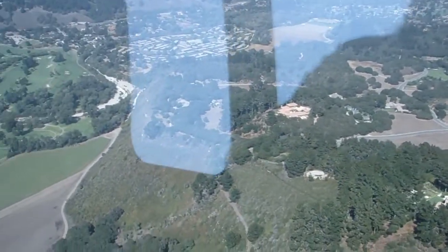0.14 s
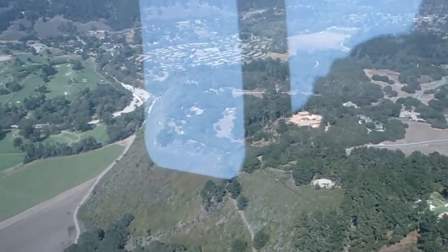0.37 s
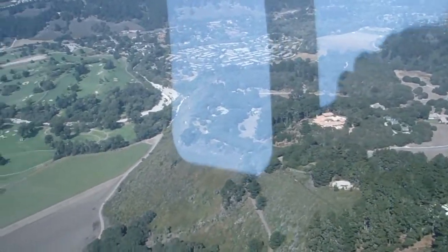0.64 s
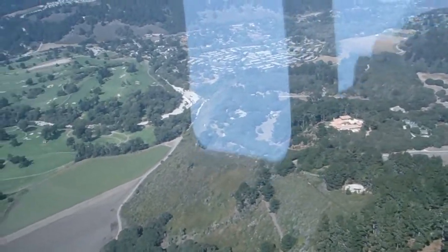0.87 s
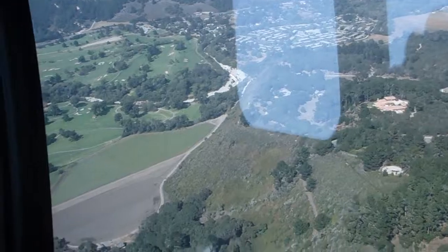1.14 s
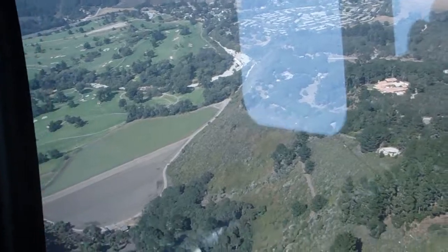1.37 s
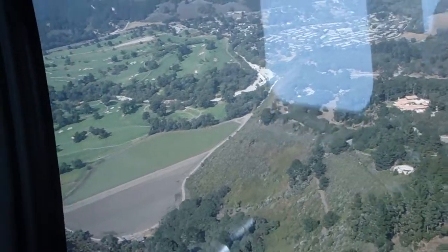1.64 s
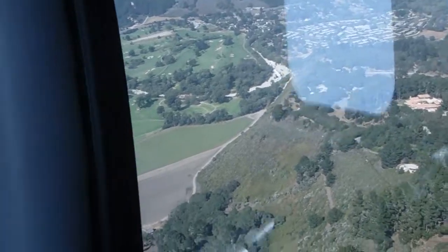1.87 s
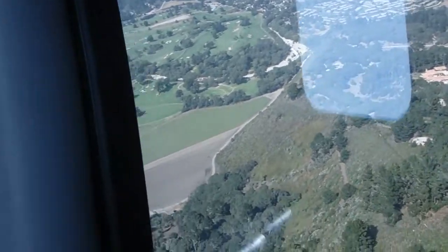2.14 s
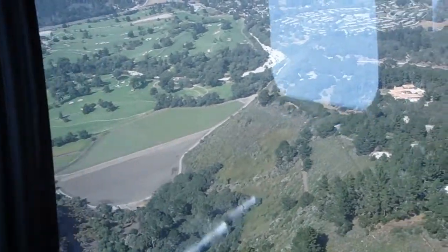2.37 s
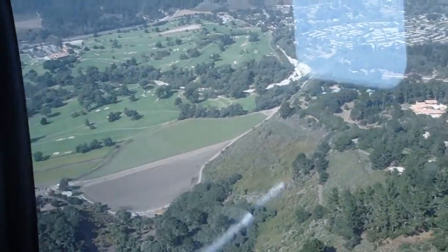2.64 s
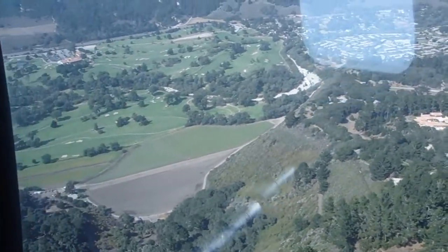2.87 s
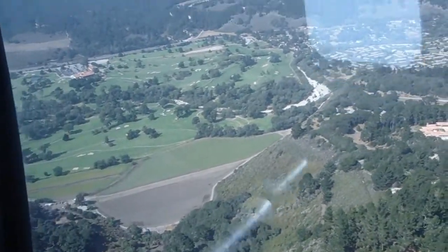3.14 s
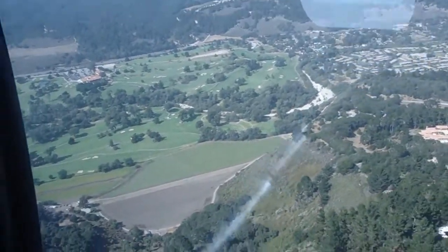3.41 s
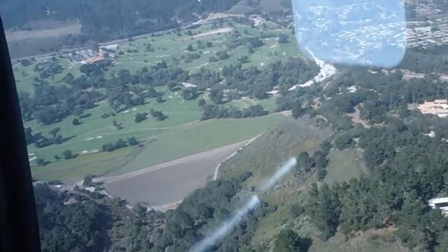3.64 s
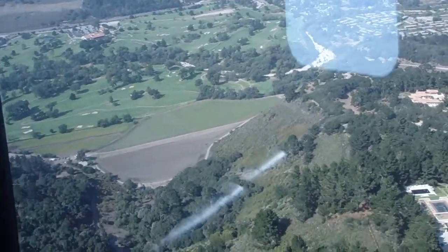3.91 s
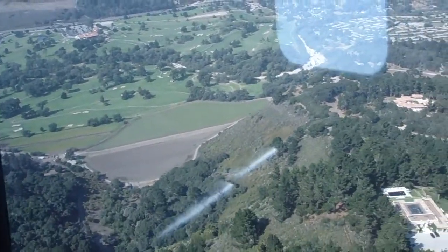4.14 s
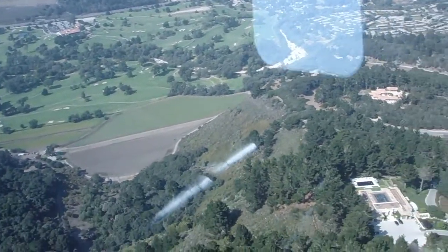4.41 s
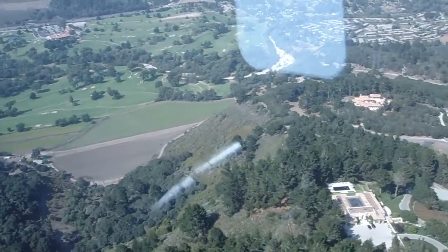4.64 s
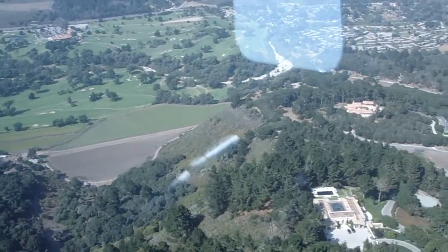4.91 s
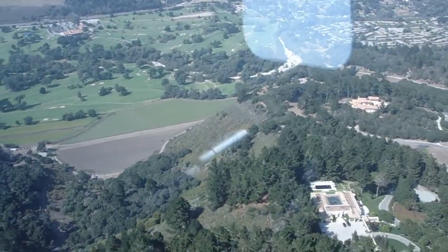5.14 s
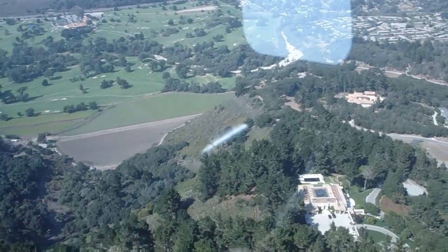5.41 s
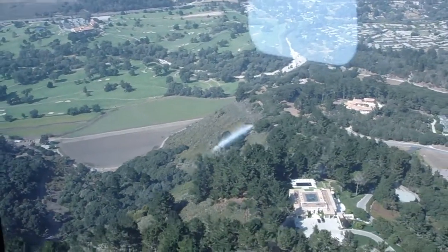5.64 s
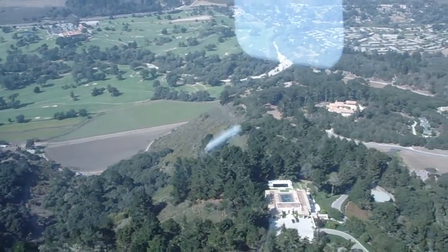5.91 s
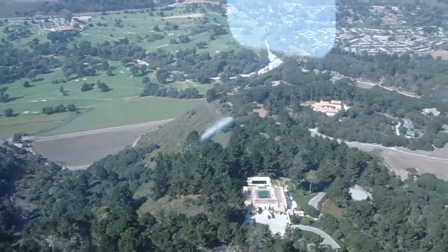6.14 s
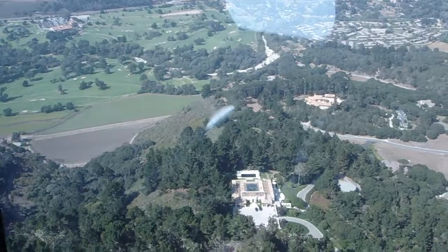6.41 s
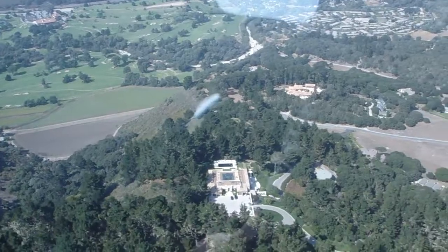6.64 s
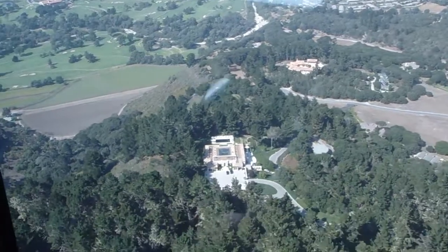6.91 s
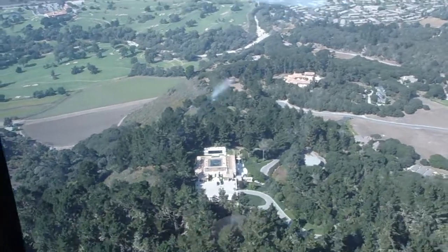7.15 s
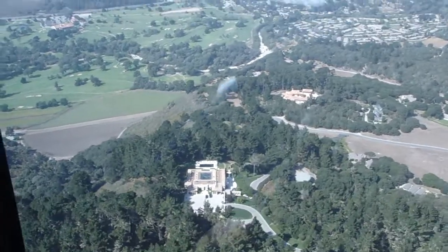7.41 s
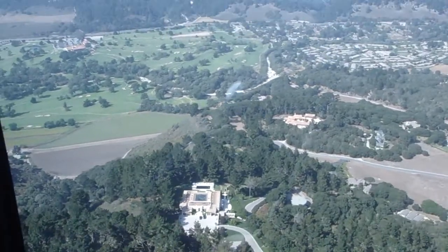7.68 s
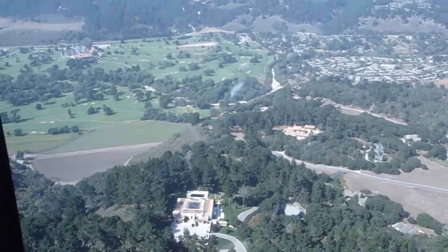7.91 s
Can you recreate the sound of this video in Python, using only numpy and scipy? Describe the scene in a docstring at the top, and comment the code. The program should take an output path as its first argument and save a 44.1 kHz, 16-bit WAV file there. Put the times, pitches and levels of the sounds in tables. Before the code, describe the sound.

Continuous loud helicopter interior: deep humming rotor beat, buffeting rumble and rushing air, with a piercing mid-high metallic whine that flutters and surges throughout.

```python
"""Main and tail rotor of a helicopter beat as low hums, heard from inside the cabin in flight. The gearbox
whines on its tooth-mesh tones; rotors and gearbox are sines that ride one wavering rotor speed. Behind them
a compressor whistle, a sine on its own shaft, and two shaped noises: airframe rumble and a broad turbine and
air roar. A small pair of microphone ports hears it all close to overload."""
import sys
import numpy as np
from scipy import signal
from scipy.fft import rfft, irfft, next_fast_len
from scipy.io import wavfile
from scipy.ndimage import uniform_filter1d

SR = 44100
rng = np.random.default_rng(int(sys.argv[2]) if len(sys.argv) > 2 else 0)


def boost_factor(decibels):
    """Convert a level in decibels to a linear amplitude factor."""
    exponent = np.asarray(decibels, float) / 20
    return 10 ** exponent


def generate_wav(sig):
    """Save sig (samples, or channels by samples) to the path in sys.argv[1] as 16-bit PCM at SR."""
    pcm = np.round(np.clip(np.atleast_2d(sig).T, -1, 1) * 32767).astype(np.int16)
    wavfile.write(sys.argv[1], SR, pcm)


N = 354563
SECONDS = np.arange(N) / SR
COARSE_S = SECONDS[::512]  # enough for slow drifts
LEFT_RIGHT = np.array([[0.5], [-0.5]])  # splits a left-over-right difference between the ports


def read(points, hz):
    """A spectrum joined by straight lines on a log-frequency axis."""
    point_hz, value = np.transpose(points)
    return np.interp(np.log(hz + 1), np.log(point_hz + 1), value)


def follow(rows, t=SECONDS):
    """Every column of a curve table at the times t."""
    start_s, *columns = np.transpose(rows)
    return [np.interp(t, start_s, column) for column in columns]


def wander(t, top_hz, count=16):
    """Slow chance drift of rms about 1: sines of random phase, the slower ones stronger."""
    rates_hz = np.geomspace(0.15, top_hz, count)
    phases = rates_hz[:, None] * t + rng.random((count, 1))
    sines = np.sin(2 * np.pi * phases) / np.sqrt(rates_hz[:, None])
    return sines.sum(0) / np.sqrt(np.sum(0.5 / rates_hz))


def wavering(levels_db, depth_db, top_hz, lift_db):
    """Levels that drift by chance around their means."""
    def drift_db():
        return np.interp(SECONDS, COARSE_S, depth_db * wander(COARSE_S, top_hz))
    return [level_db + lift_db + drift_db() for level_db in levels_db]


def tone(turns, level_db, apart_turns=0):
    """A sine of the given rms level at both ports, with a phase difference between them."""
    phase = turns + rng.random() + LEFT_RIGHT * apart_turns
    return np.sqrt(2) * boost_factor(level_db) * np.sin(2 * np.pi * phase)


# rotor speed against its mean: (start_s [s], speed [percent])
ROTOR_SPEED = [(0.0, 0.22), (0.8, -0.01), (1.61, -0.04), (2.3, 0.12), (3.22, -0.12), (4.1, 0.11),
               (4.82, 0.03), (5.23, 0.08), (6.03, 0.04), (6.5, -0.06), (7.64, -0.03), (8.04, 0.1)]


def geared(tones_hz, levels_db):
    """Tones locked to the rotor speed; each arrives from a drifting direction, so its port delay drifts."""
    rotor_clock_s = np.cumsum(1 + follow(ROTOR_SPEED)[0] / 100) / SR
    total = 0
    for hz, level_db in zip(tones_hz, levels_db):
        delay_s = np.interp(SECONDS, COARSE_S, 14e-6 * wander(COARSE_S, top_hz=1.476))
        total = total + tone(hz * rotor_clock_s, level_db, hz * delay_s)
    return total


# likeness of the noise at the left and right port: (pitch_hz [Hz], likeness [0-1])
PORT_LIKENESS = [(60, .985), (150, 1), (370, 1), (750, .99), (1100, .9), (2290, .8), (5680, .8), (14100, 0)]


def noise(shape_db, size):
    """Random short-time spectra, partly shared by the ports; shape_db(hz, t) is in dB per Hz."""
    hop = size // 4
    frames, hz = N // hop + 5, np.fft.rfftfreq(size, 1 / SR)
    t = np.arange(frames) * hop / SR
    a, b, c, d = rng.standard_normal((frames, len(hz), 4)).T
    left, other = a + 1j * b, c + 1j * d
    same = read(PORT_LIKENESS, hz)[:, None]
    right = same * left + np.sqrt(1 - same ** 2) * other
    per_hz = np.sqrt(3 * SR / size / 2)  # makes the shape a density
    spectra = np.array([left, right]) * per_hz * boost_factor(shape_db(hz, t))
    return signal.istft(spectra, nperseg=size, noverlap=size - hop)[1][:, :N]


# shared swell; gearbox and whistle take all of it, the noises a share: (start_s [s], lift_db [dB])
SWELL = [(0.0, -6), (0.11, -2.5), (0.25, -5), (0.6, 3), (0.89, -4), (1.0, -0.5), (1.18, -4.5), (1.38, 0.1),
         (1.56, 0.4), (1.79, -5.5), (2.2, -1.5), (2.38, 3), (2.68, 3.5), (2.79, -0.5), (3.01, -3),
         (3.33, 0.3), (3.7, -2), (3.91, -4), (4.02, -3.1), (4.26, 0.5), (4.47, -2.5), (4.7, 3), (4.91, 0.8),
         (5.25, 2.5), (5.58, -2), (5.8, 1.4), (6.03, 2.5), (6.24, -4.5), (6.48, 0.5), (7.03, 3.5),
         (7.15, 0), (7.48, -3), (7.6, -1), (7.93, -2), (8.04, 1.5)]
# airframe rumble before the swell: (pitch_hz [Hz], level_db [dB per Hz])
RUMBLE_SPECTRUM = [(14, -64), (20, -68), (30, -56), (42, -37), (60, -40.5), (90, -40.5), (130, -40.5),
                   (200, -48), (290, -59), (600, -100), (2000, -150)]


def rumble():
    """Low buffeting of the airframe as shaped noise, only lightly tied to the swell."""
    def shape_db(hz, t):
        return read(RUMBLE_SPECTRUM, hz)[:, None] + 0.5 * follow(SWELL, t)[0]
    return noise(shape_db, size=8192)


# turbine and airflow roar before panels, swell and gusts: (pitch_hz [Hz], level_db [dB per Hz])
ROAR_SPECTRUM = [(100, -62.5), (290, -56.5), (600, -56.5), (760, -62), (1500, -68), (2700, -73),
                 (4100, -77.5), (4700, -81.5), (6200, -85.5), (7500, -88), (12000, -91), (14100, -91)]
# cabin panels that lift the roar: (pitch_hz [Hz], width_hz [Hz], lift_db [dB])
PANELS = [(362, 25, 2), (1813, 140, 6.5), (2200, 46, 7.5), (10460, 330, 4.5), (13000, 400, 4.5)]
# slow gusts in the low body of the roar, fading out above 390 Hz: (start_s [s], lift_db [dB])
GUST = [(0, -5), (1, -5.5), (1.8, -5.5), (2.5, 2), (2.9, 1), (3.3, 7.5), (4, -3), (4.7, -1.5), (5.3, 0),
        (5.9, 3), (6.3, 1.5), (7, 2), (7.6, 3), (8.04, -2)]


def roar():
    """Broad noise through resonant panels, swelling as one, flickering a little, chopped by the tail rotor."""
    def shape_db(hz, t):
        low_body = 1 / (1 + (hz / 390) ** 4)
        gust = np.outer(low_body, follow(GUST, t)[0])
        panels = sum(db * np.exp(-((hz - f) / width) ** 2) for f, width, db in PANELS)
        flicker = 2.5 * uniform_filter1d(rng.standard_normal(len(t)), size=6)
        return (read(ROAR_SPECTRUM, hz) + panels)[:, None] + 0.81 * follow(SWELL, t)[0] + flicker + gust
    steady = noise(shape_db, size=1024)
    tail_hz = BLADE_HZ[2]
    chop = np.sin(2 * np.pi * tail_hz * SECONDS)
    return steady * (1 + 0.087 * chop)


# compressor whistle, on its own shaft: (start_s [s], pitch_hz [Hz])
WHISTLE_PITCH = [(0, 10398), (.6, 10350), (1.1, 10357), (2.3, 10421), (3.5, 10376), (4.1, 10380),
                 (5.4, 10335), (6.0, 10336), (6.93, 10395), (8.04, 10383)]


def compressor():
    """A thin whistle: one sine whose level breaks up by chance, nearer the left port."""
    level_db = wavering([-63], depth_db=3, top_hz=20, lift_db=follow(SWELL)[0])[0]
    turns = np.cumsum(follow(WHISTLE_PITCH)[0]) / SR
    return tone(turns, level_db) * boost_factor(3 * LEFT_RIGHT)


# weaker gear-mesh tones, overtones and sidebands: pitch_hz [Hz]
MESH_HZ = [630.5, 799.8, 944.9, 3263.6, 3424.1, 3642.6, 3846, 4062.9, 4298.4, 4862.5, 5397.4, 5694.2,
           6495.1, 6849.1, 8597.5]
# their mean levels before echo, blooms and swell: (before_db, after_db the microphone turns [dB rms])
MESH_DB = [(-42, -36), (-51, -42), (-48, -62), (-44, -47), (-44, -46), (-46.5, -43), (-55, -54.5),
           (-51.5, -49), (-49.5, -48), (-56, -59), (-59, -58), (-58.5, -63.5), (-68, -69), (-62, -62.5),
           (-63, -64.5)]
# single tones stand out or drop away: (middle_s [s], length_s [s], pitch_hz of nearest tone [Hz], lift_db [dB])
BLOOMS = [(.15, .3, 3643, 10), (2.0, .2, 631, 6), (2.9, .25, 631, 4), (3.8, .2, 631, 3),
          (5.36, 0.35, 631, 2), (.1, 0.54, 945, 6), (.9, 0.79, 3264, 7.5), (1.0, .5, 6495, 12),
          (1.05, 0.59, 6849, 9), (1.0, 0.54, 5397, 6), (1.397, .35, 3424, 4.5), (1.55, 0.72, 4298, 4),
          (1.7, .4, 3643, 2), (2.0, 0.45, 4063, 6), (2.2, 0.64, 3424, 4.5), (2.25, 0.44, 3264, 3),
          (2.4, 0.32, 4298, -8), (2.8, .9, 6849, 5.5), (2.9, 1, 3643, 5), (3.3, 1, 945, 8.5),
          (3.35, 0.31, 3424, 7), (3.353, 0.27, 4298, 7.5), (3.9, 0.58, 3643, -10), (4.0, .5, 800, 4),
          (4.0, 0.57, 4063, 3), (4.0, .6, 4863, 6), (4.05, 0.99, 6849, 9), (4.1, 1, 4298, 4),
          (4.303, 0.6, 3264, 0), (5.7, .9, 8598, 3), (5.8, 1., 800, 5.5), (6.0, .7, 6849, 4),
          (6.6, 0.86, 3424, 7), (6.5, 0.47, 3264, 4.5), (6.8, 1., 3846, 8), (7.5, .5, 3264, 6),
          (7.5, 0.64, 3424, 8.5)]
TURN_S, TURN_LENGTH_S = 3.9, 0.32  # middle and length of the microphone's turn across the window
ECHO_SHARE, ECHO_DRIFT_TURNS = 0.36, 0.44  # echo pressure against direct sound; rms drift of its phase


def fading(hz, before_db, after_db):
    """Direct sound and echo add or cancel as the microphone drifts through the standing waves."""
    turned = 1 / (1 + np.exp((TURN_S - COARSE_S) / TURN_LENGTH_S * 4))
    phase = 2 * np.pi * (rng.random() + ECHO_DRIFT_TURNS * wander(COARSE_S, top_hz=1.5))
    echo_db = 10 * np.log10(1 + 2 * ECHO_SHARE * np.cos(phase) / (1 + ECHO_SHARE ** 2))
    bloom_db = 0
    for middle_s, length_s, bloom_hz, lift_db in BLOOMS:
        nearest_hz = min(MESH_HZ, key=lambda f: abs(f - bloom_hz))
        if nearest_hz == hz:
            bloom_db = bloom_db + lift_db * np.exp(-(2 * (COARSE_S - middle_s) / length_s) ** 2)
    level_db = before_db + (after_db - before_db) * turned + echo_db + bloom_db
    return np.interp(SECONDS, COARSE_S, level_db)


# loudest whine, its upper shaft sideband, the four next whines, the high whine's sideband: pitch_hz [Hz]
WHINE_HZ = [1821.4, 1853.2, 2431.4, 1631.5, 1260.9, 855.6, 2463.5]
# whine levels before the swell, each (start_s [s], level_db [dB rms]): the loudest,
# its sideband that makes it flutter, the whine above, and three below from high to low
WHINE_DB = [(0, -30), (.67, -32.5), (.93, -24.5), (1.14, -25), (1.36, -36), (1.56, -35), (2.0, -26),
            (2.46, -30.5), (2.68, -34), (2.9, -28.5), (3.13, -33), (3.35, -20), (3.57, -34.5), (3.8, -41),
            (4.04, -27.5), (4.4, -28.5), (4.88, -37), (5.16, -31), (5.8, -24.5), (6.5, -24), (6.75, -26),
            (7.15, -25.5), (7.6, -28), (7.82, -34), (8.04, -30)]
FLUTTER_DB = [(0, -47), (.5, -48), (1, -57), (2, -70), (2.5, -48), (3.55, -48), (4.0, -39), (4.6, -40.5),
              (5.4, -49), (6.1, -37), (7, -46), (8.04, -49)]
HIGH_DB = [(0, -50), (.45, -35.5), (.67, -34.5), (1.05, -42.5), (1.4, -36), (1.6, -37.5), (1.79, -47),
           (2.0, -35.5), (2.25, -35), (2.68, -48), (2.9, -44), (3.35, -40.5), (3.57, -43), (3.8, -34.5),
           (4.24, -36), (4.6, -41), (4.91, -38), (5.4, -44.5), (6.03, -50), (6.25, -38.5), (6.5, -40),
           (7.3, -43), (7.8, -50), (8.04, -43)]
BELOW_DB = [(0, -33), (.45, -33), (1.05, -47), (1.79, -38), (2.3, -36.5), (2.9, -44), (3.15, -40),
            (3.5, -45), (3.85, -37), (4.9, -35.5), (5.4, -37), (5.7, -41), (6.25, -40), (6.7, -47),
            (7.85, -43), (8.04, -35)]
MIDDLE_DB = [(0, -41.5), (.45, -35.5), (1.56, -36.5), (1.85, -43.5), (2.25, -36), (2.46, -38), (3.35, -45),
             (3.9, -37.5), (6.3, -35.5), (6.9, -38), (7.8, -37), (8.04, -37)]
LOW_DB = [(0, -38), (.22, -33), (.5, -49), (.89, -37), (1.3, -45), (1.56, -36), (2.0, -45), (2.23, -37),
          (2.9, -41.5), (3.57, -51), (4.0, -30.5), (4.24, -44), (4.47, -31.5), (4.8, -36), (5.6, -35),
          (6.0, -38), (6.25, -31.5), (6.7, -38.5), (7.6, -35.5), (7.82, -47), (8.04, -40)]
# tail rotor multiples, mesh overtones, shaft sidebands: (pitch_hz [Hz], level_db before cut and swell [dB rms])
FAINT = [(277.2, -40.5), (330.7, -37.5), (346.5, -39.7), (415.9, -41.3), (459.4, -43.3), (521.2, -41.8),
         (588.6, -38.4), (1599.7, -49.8), (1789.3, -48), (1847, -50.3), (1891.4, -49.8), (3231.3, -55.3)]


def gearbox():
    """Meshing teeth sound as whines at fixed ratios to the rotor speed, with shaft sidebands and overtones."""
    faint_hz, faint_db = np.transpose(FAINT)
    faint = geared(faint_hz, wavering(faint_db, depth_db=2.5, top_hz=2.5, lift_db=-0.5))
    curves = (WHINE_DB, FLUTTER_DB, HIGH_DB, BELOW_DB, MIDDLE_DB, LOW_DB)
    levels_db = [follow(curve)[0] for curve in curves]
    high_sideband_db = levels_db[2] - 8.5
    whines = geared(WHINE_HZ, levels_db + [high_sideband_db])
    mesh = geared(MESH_HZ, [fading(hz, *row) for hz, row in zip(MESH_HZ, MESH_DB)])
    return (whines + mesh + faint) * boost_factor(follow(SWELL)[0])


# main rotor blade passage, its second multiple, tail rotor blade passage: pitch_hz [Hz]
BLADE_HZ = [25.6, 51.1, 69.3]
# mean levels of the two main rotor hums: level_db [dB rms]
MAIN_ROTOR_DB = [-27.5, -19.3]
# tail rotor hum: (start_s [s], level_db [dB rms])
TAIL_ROTOR_DB = [(0, -16), (.9, -16), (1.34, -14.3), (1.79, -18.1), (2.68, -13.6), (3.4, -17.5),
                 (4.9, -14.5), (7.1, -14.9), (8.04, -17.4)]
# weaker low hums, among them rotor multiples and shaft hums: (pitch_hz [Hz], level_db before a small cut [dB
# rms])
HUMS = [(34.7, -38), (43.7, -34), (76.7, -30), (94.9, -27), (97.9, -22.5), (102.3, -26.5), (138.6, -27),
        (185.9, -33.5), (199.9, -32.6), (207.9, -32.6)]


def rotors():
    """Blade passages and further low hums as sines; close neighbours beat into the throb."""
    hums_hz, hums_db = np.transpose(HUMS)
    hums = geared(hums_hz, wavering(hums_db, depth_db=2, top_hz=3, lift_db=-1))
    main_db = wavering(MAIN_ROTOR_DB, depth_db=1.1, top_hz=1.5, lift_db=0)
    blades = geared(BLADE_HZ, main_db + follow(TAIL_ROTOR_DB))
    return blades + hums


def scene():
    """All sources at the two ports, summed."""
    return rotors() + gearbox() + compressor() + rumble() + roar()


def gain_control(x, knee_db, share, recover_db_per_s):
    """Falls quickly on loud peaks and recovers slowly, so the whole sound ducks with the throb."""
    power = uniform_filter1d((x ** 2).mean(0), size=441)
    power_db = 10 * np.log10(abs(power) + 1e-12)
    fall_db = SECONDS * recover_db_per_s
    held_db = np.maximum.accumulate(power_db + fall_db) - fall_db
    over_db = np.maximum(held_db - knee_db, 0)
    return x / boost_factor(share * uniform_filter1d(over_db, size=441))


# left port over right port: (pitch_hz [Hz], level_db [dB])
PORT_LEAN = [(60, 0.5), (230, 0.0), (920, -0.6), (3600, 0.5), (14100, 2.2)]


def ports(dry):
    """Left port lags the right, more so in the bass; they differ in level and hear nothing above 14180 Hz."""
    size = next_fast_len(N + 4096)
    hz = np.fft.rfftfreq(size, 1 / SR)
    lag_rad = 2 * np.pi * hz * 26e-6 + 12.2 / (hz + 6)
    response = boost_factor(LEFT_RIGHT * read(PORT_LEAN, hz)) * np.exp(-1j * LEFT_RIGHT * lag_rad) * (hz < 14180)
    return irfft(rfft(dry, size) * response, size)[:, :N]


def roll_off(x):
    """The treble ends steeply here."""
    return signal.sosfilt(signal.butter(12, 14710, fs=SR, output="sos"), x)


def record(dry):
    """The microphone ports feed a gain control that ducks on peaks, which then round off in overload."""
    ducked = gain_control(ports(dry), knee_db=-9.5, share=0.84, recover_db_per_s=24.5)
    heard = boost_factor(1.5) * ducked
    rounded = heard / (1 + abs(heard / 0.96) ** 6) ** (1 / 6)
    return roll_off(rounded)


dry = scene()
out = record(dry)
generate_wav(out)
```